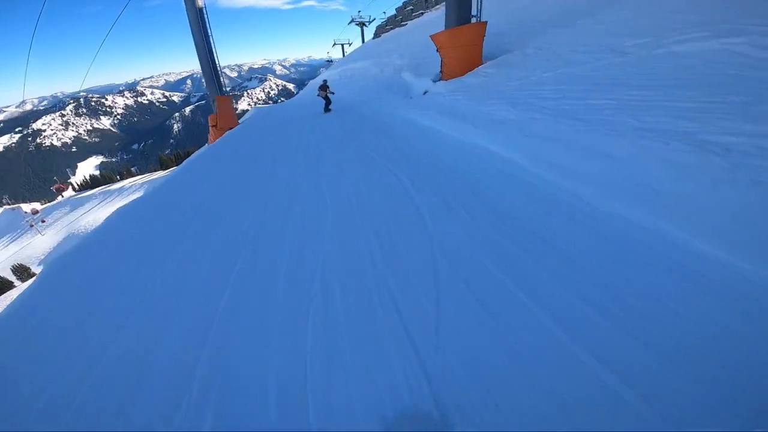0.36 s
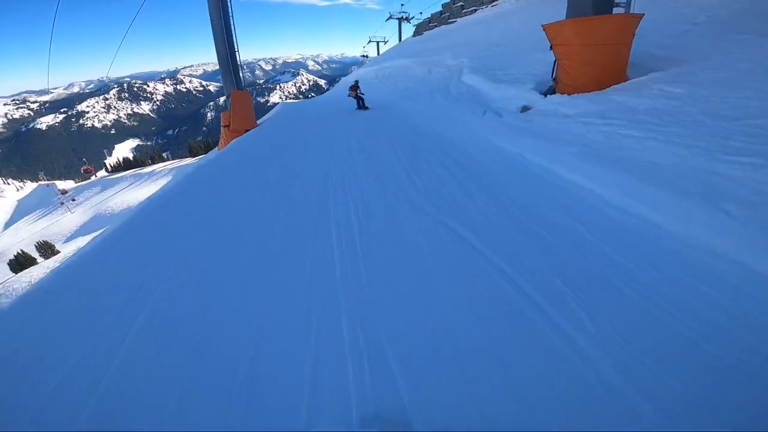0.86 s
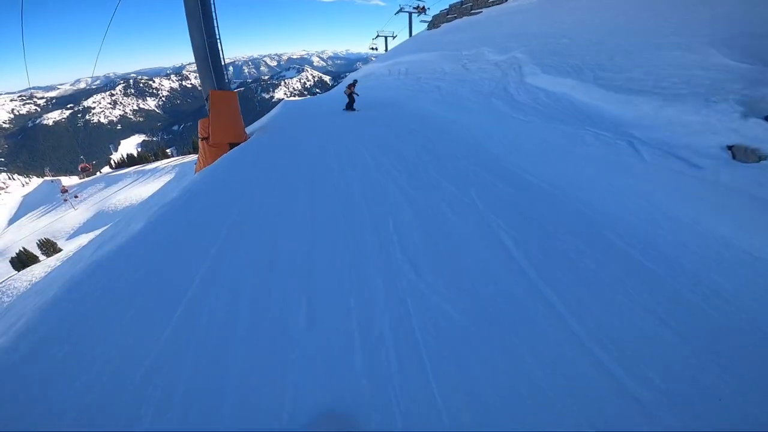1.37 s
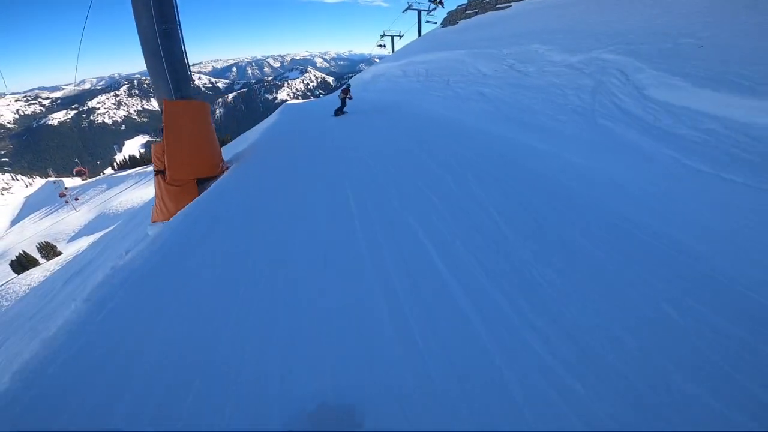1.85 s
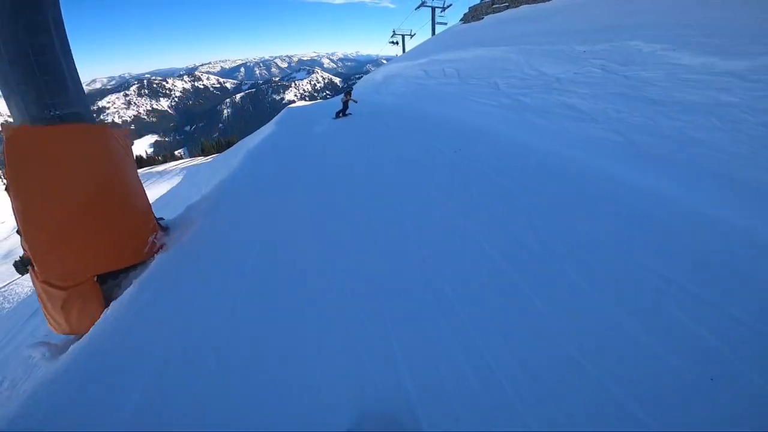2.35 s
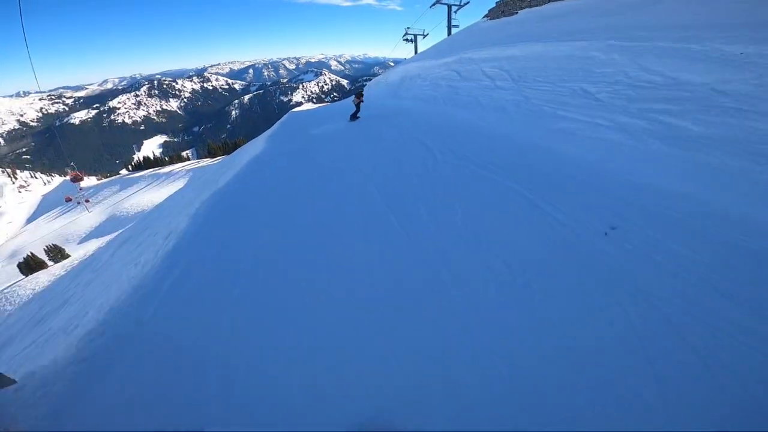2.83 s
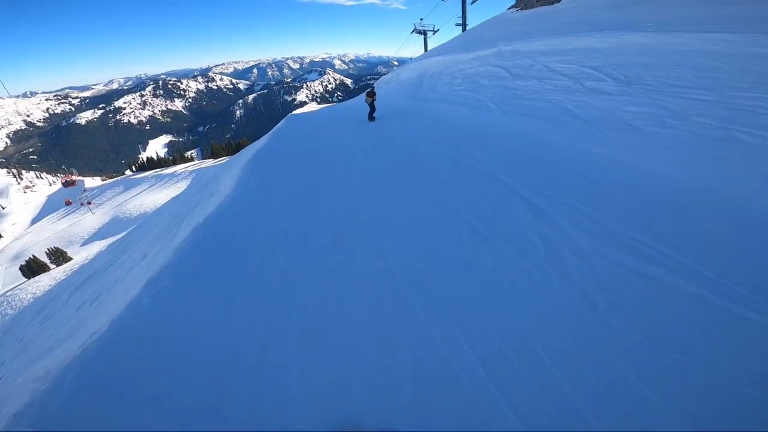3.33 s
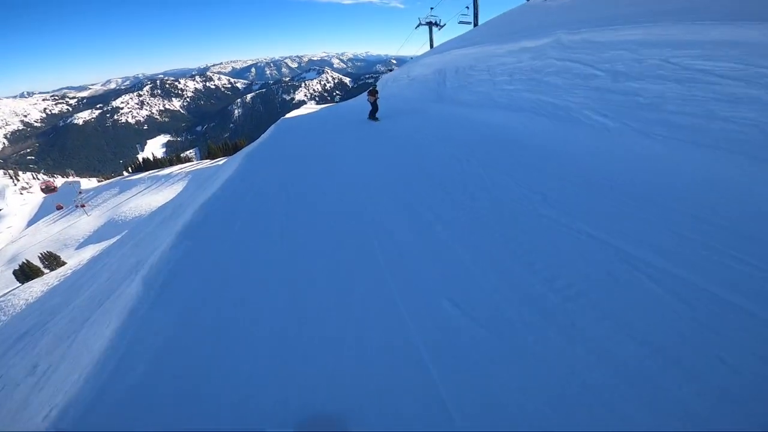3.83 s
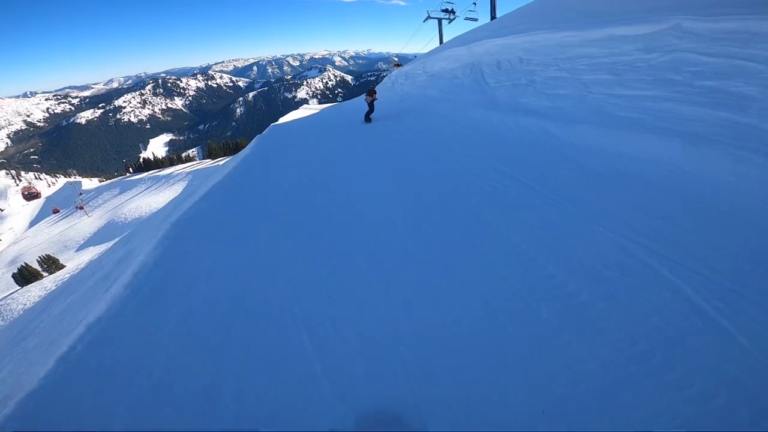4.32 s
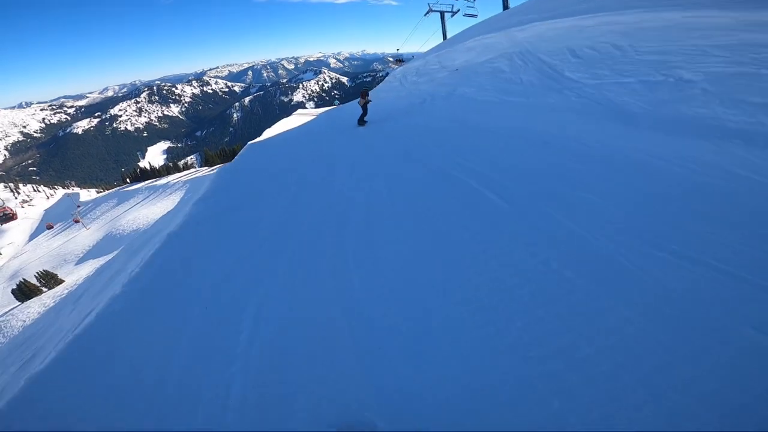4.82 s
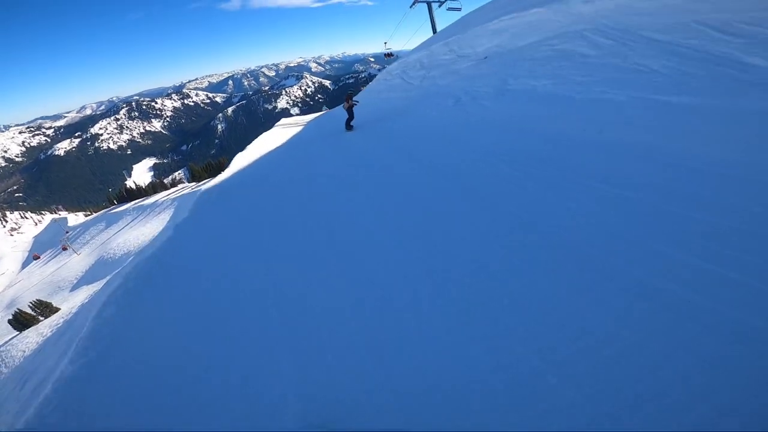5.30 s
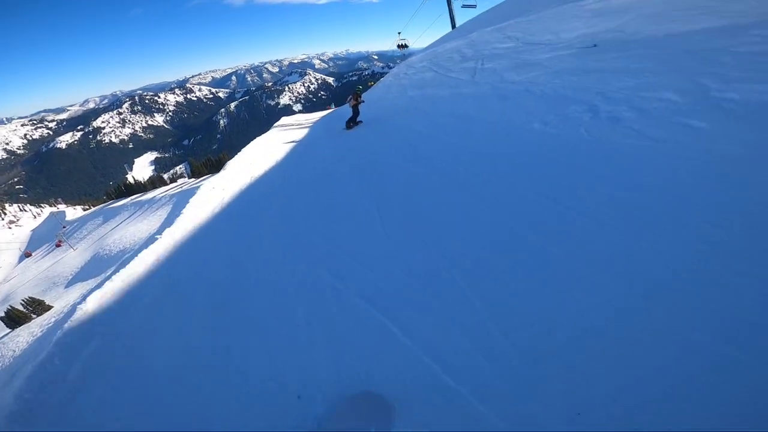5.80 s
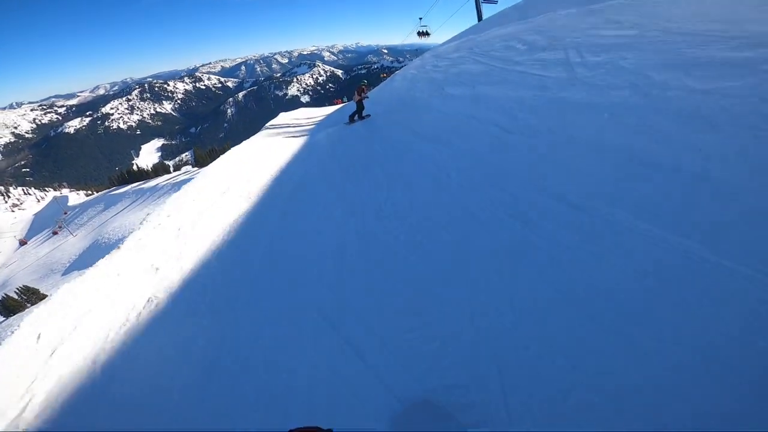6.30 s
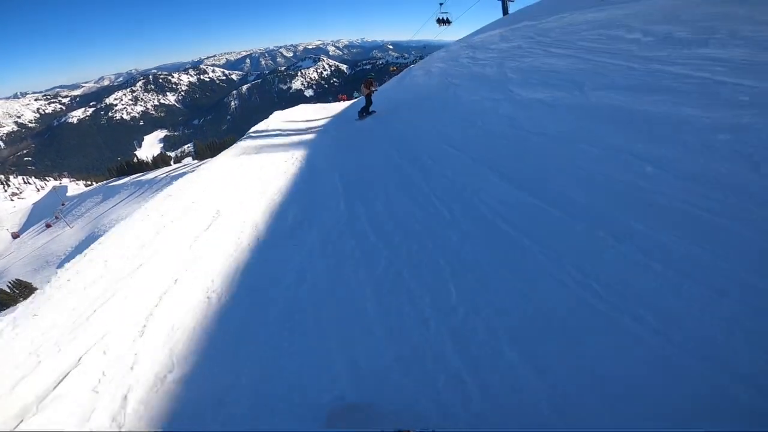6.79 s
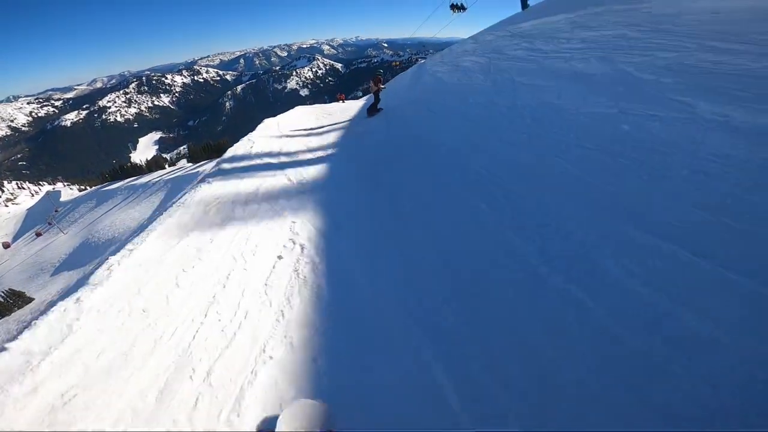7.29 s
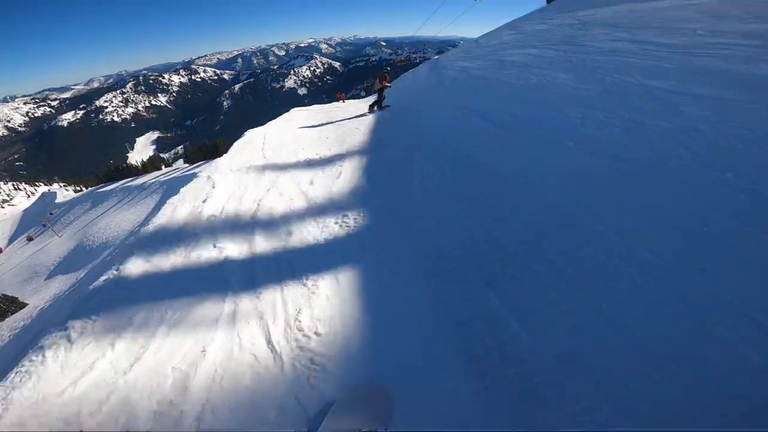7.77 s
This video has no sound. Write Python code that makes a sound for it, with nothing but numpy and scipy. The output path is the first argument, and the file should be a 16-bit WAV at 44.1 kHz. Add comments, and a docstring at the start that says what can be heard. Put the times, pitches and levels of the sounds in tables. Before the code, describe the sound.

Low wind buffets and roars over a small camera's housing while a snowboard edge scrapes firm snow, biting harder and hissing with spray near the end.

```python
"""A ride down firm snow, heard in a small camera's closed housing. From the start wind buffets the housing (low
noise), eddies roar in its air cavity (pushes and hiss), and the board edge scrapes, sings and throws spray (noise
bands). Short ticks fall near 0.5 s, then rarely; eddies slap from 0.6 s (short puffs); the opening hoots from 1 s
(narrow noise). The edge shrieks at 2.6 s and in strokes from 4.7 s (pitched hiss); from 5.5 s the spray's
4-6 kHz hiss swells, and the edge bites hardest after 6.3 s."""
import sys
import numpy as np
from scipy import signal
from scipy.fft import rfft, irfft, next_fast_len
from scipy.io import wavfile
from scipy.ndimage import uniform_filter1d, minimum_filter1d

SR = 44100
rng = np.random.default_rng(int(sys.argv[2]) if len(sys.argv) > 2 else 0)


def put_to_file(sound):
    """Save the sound as 16-bit audio at rate SR, in the file named by the first command-line argument."""
    columns = np.atleast_2d(sound).T  # one column per channel
    safe = np.clip(columns, -1, 1)
    whole_steps = np.round(safe * 32767)
    wavfile.write(sys.argv[1], SR, whole_steps.astype(np.int16))


def elevation(decibels):
    """Turn decibel levels (scalar or array-like) into linear amplitude ratios."""
    levels = np.asarray(decibels, float)
    return 10 ** (levels / 20)


N = 359415
TIME_S = np.arange(N) / SR

# source spectra ahead of the cavity, relative: freq_hz, density_db
BUFFET_SPECTRUM = [(12, -26.5), (22, -6), (54, 0), (110, -0.5), (160, -4.5), (330, -17), (700, -34),
                   (2000, -110)]
ROAR_SPECTRUM = [(40, -14), (200, 6.5), (330, 1), (570, -2), (780, -5.5), (1400, -13), (1900, -21),
                 (2200, -33), (4500, -48.5), (9000, -110)]
SLAP_SPECTRUM = [(150, -8.5), (600, 0.5), (1100, 3), (1900, -17.5), (4000, -44), (9000, -110)]
HOOT_SPECTRUM = [(500, -39.5), (950, -6.5), (1150, -5), (1400, -10.5), (2200, -57.5), (6000, -110)]
SCRAPE_SPECTRUM = [(600, -34.5), (2000, -5.5), (2600, 1.5), (3100, 0.5), (3900, -5.5), (4600, -10),
                   (5200, -24), (7000, -55)]
SING_SPECTRUM = [(1500, -69.5), (3100, -5.5), (3450, 0), (3750, -12.5), (6000, -52)]
SPRAY_SPECTRUM = [(2500, -23), (4300, 5.5), (5300, -0.5), (6050, -4), (7700, -7), (8300, -16.5),
                  (10500, -26), (12500, -30.5), (14500, -60.5)]
SPRAY_BRIGHT_SPECTRUM = [(3500, -24.5), (4400, -2.5), (5800, -1.5), (6150, -23.5)]
TICK_SPECTRUM = [(800, -24), (1700, -5), (1980, 7), (2250, -5), (2500, 1), (3050, -6), (3500, 3),
                 (4000, -4), (4550, 3), (5250, -12), (5700, -2), (6400, -24), (7100, -26), (8200, -38),
                 (11500, -35), (14000, -55)]
# air modes of the housing, over the walls' own path: freq_hz, width_hz, gain_db
CAVITY_MODES = [(1095, 330, 9.5), (3400, 420, 4)]
# microphone ports: freq_hz, likeness_0_to_1, right_lead_rad, left_over_right_db
PORT_RESPONSE = [(30, 0.9, .1, 7), (119, 0.94, 0.05, 3.5), (400, 0.66, 0.52, 2.5), (790, 1, 1.1, 4),
                 (1150, 0.98, 0.73, 7), (1700, 0.94, 0.69, 6), (2200, 0.4, 1.3, 3.5), (3360, 0.2, 1.6, 13),
                 (3970, .35, 1.3, 11.5), (4440, .2, 3.8, 10), (5200, 0.96, 3.7, 1.5), (5900, .68, 11, 0.5),
                 (6600, .15, 4, 7.5), (8020, .1, 2.4, 26), (12000, .3, .1, 10.5)]
# head turning against the airflow, used less its mean: time_s, left_over_right_db
FACING = [(0, 3.5), (1.4, 4.5), (2.1, 3), (2.8, 3.5), (4.2, 3), (4.6, 5.5), (5.5, 3), (6.1, 4.5),
          (6.8, 4.5), (7.2, 3), (8.15, 3.5)]
# air speed as buffeting strength, before gusts: time_s, level_db
AIRFLOW = [(0, -20.5), (.33, -19.5), (.5, -22.5), (.75, -18), (1.5, -18), (1.7, -16), (2.36, -22.5),
           (2.53, -16.5), (2.75, -20), (3.6, -16), (3.76, -19), (3.95, -16), (4.4, -18), (4.95, -22),
           (5.6, -15.5), (5.95, -23), (6.55, -19), (6.92, -24), (7.12, -16), (7.5, -22), (7.72, -15),
           (8.15, -20)]
# gusts tearing eddies off the housing: start_s, length_s, swell_db
GUSTS = [(0.11, 0.31, 3.5), (0.54, 0.28, 4), (0.99, 0.17, 5.5), (1.5, 0.64, 9), (2.41, 0.33, 3),
         (2.66, 0.18, 6.5), (2.97, 0.088, 5.5), (3.04, 0.56, 6), (3.4, 0.36, 7.5), (3.81, 0.36, 12),
         (4.07, 0.26, 12), (4.53, 1.06, 8.5), (4.7, 0.15, 3.5), (4.98, 0.12, 6.5), (5.23, 0.17, 6),
         (5.3, 0.94, 9.5), (6.15, 0.22, 5), (6.25, 1.34, 11), (7.15, 0.12, 7), (7.38, 0.14, 3),
         (7.38, 1.25, 10.5)]
# strong single eddies slapping the housing, before the ports: start_s, peak_db
SLAPS = [(0.592, -20), (0.895, -15.5), (1.057, -19), (1.527, -23), (1.911, -17), (2.364, -22),
         (2.477, -18.5), (2.529, -14.5), (2.67, -21), (2.722, -18), (3.004, -14.5), (3.483, -13),
         (3.551, -15.5), (3.923, -22), (4.046, -17), (4.102, -19), (4.867, -19.5), (5.118, -13.5),
         (5.724, -19.5), (5.774, -13.5), (6.188, -21.5), (6.808, -25), (7.173, -15.5), (7.304, -25.5),
         (7.423, -25.5), (7.485, -25.5), (7.674, -20), (7.859, -19.5)]
# airflow across the housing's opening: start_s, length_s, swell_db
HOOTS = [(1.0, 0.23, 7), (1.75, .35, 7), (2.42, 0.55, 9.5), (3.9, 0.45, 8), (4.73, 0.15, 15.5),
         (4.99, 0.15, 9), (5.5, 0.16, 10), (6.16, 0.14, 17), (6.4, 0.46, 15), (6.72, 0.21, 16),
         (6.93, 0.32, 9), (7.55, 1, 12)]
# edge biting into snow: start_s, length_s, swell_db
BITES = [(.07, 0.47, 0.5), (.67, 0.16, 4), (.86, .39, 3), (1.55, 0.5, 4), (2.26, 0.99, 7.5), (2.63, .22, 4),
         (2.81, 1.1, 4), (3.07, 0.16, 5.5), (3.71, 0.81, 5.5), (3.97, 0.067, 11.5), (4.54, 1.24, 10),
         (4.7, 0.14, 6), (4.98, .14, 12), (5.21, 0.15, 5.5), (5.36, 1.32, 8), (5.43, 0.28, 5.5),
         (6.28, 1.26, 15.5), (7.33, 1.57, 12)]
# board skidding sideways: start_s, length_s, swell_db
SKIDS = [(.06, 0.32, 5.5), (.81, 0.86, 2), (.95, 0.21, 4), (1.23, .14, 6), (1.64, .1, 5),
         (1.86, 0.057, 3.5), (2.71, 1.2, 3.5), (3.07, 0.16, 2.5), (4.53, 0.87, 1), (5.51, 1.47, 3.5),
         (5.7, 0.28, 1), (6.31, 1.37, 7.5), (7.38, 0.65, 7), (7.66, 0.98, 7)]
# shrieks of the loaded edge, before the ports: start_s, length_s, nominal_top_db, pitch_hz
STROKES = [(2.603, 0.21, -60, 3460), (4.718, 0.12, -53, 3370), (5.0, 0.089, -53, 3400),
           (6.277, 0.17, -46.5, 3480), (6.45, 0.85, -47, 3400), (6.748, 0.15, -44.5, 3370),
           (6.844, .1, -41, 3340), (7.84, 0.21, -53, 2880), (7.87, 0.17, -63, 4400),
           (8.056, 0.17, -52, 4200)]
# bright spray swells: start_s, length_s, swell_db
SPRAY_SWELLS = [(5.55, .95, 17), (6.4, 1.2, 12), (7.35, 1.3, 15)]
# short ticks on the housing, and the sharp top of the slap at 3.004 s, before left/right balance:
# start_s, peak_db, brightness_db_per_octave
TICKS = [(0.5073, -22.5, 0), (0.5105, -29, -4), (0.6576, -33, -3), (3.004, -26, -18), (3.482, -45, -2),
         (7.37, -33, 5)]


def evened(x):
    """Scales to rms 1."""
    return x / np.sqrt(np.mean(x ** 2) + 1e-20)


def read(points, hz):
    """Joins table rows by straight lines on a log-frequency axis, one array a column."""
    freq_hz, *columns = np.transpose(points)
    return [np.interp(np.log(hz + 1), np.log(freq_hz + 1), c) for c in columns]


def swells(rows):
    """Sum in dB of smooth swells that rise faster than they fall."""
    rise = 0.34  # share of the length
    out_db = np.zeros(N)
    for start_s, length_s, swell_db in rows:
        u = (TIME_S - start_s) / length_s
        ramp = np.clip(np.minimum(u / rise, (1 - u) / (1 - rise)), 0, 1)
        out_db += swell_db * np.sin(np.pi / 2 * ramp) ** 2
    return out_db


def wander(hz):
    """Slow chance of rms 1, with most of its motion under hz."""
    z = rfft(rng.standard_normal(N))
    return evened(irfft(z / (1 + (np.fft.rfftfreq(N, 1 / SR) / hz) ** 2), N))


def scatter(per_s, spread_db):
    """Random one-way single pushes, a few much larger than the rest."""
    sizes = elevation(spread_db * np.minimum(rng.exponential(1, N), 3.2))
    return evened(sizes * (rng.random(N) < per_s / SR))


def dying(pushes, t60_s):
    """Envelope that jumps at each push and dies away."""
    return evened(signal.lfilter([1], [1, -elevation(-60 / (t60_s * SR))], pushes))


def cavity(x, spectrum):
    """Causal filter: a source spectrum with the housing's air modes ringing on top."""
    hz = abs(np.fft.fftfreq(8192, 1 / SR))
    rings = sum(elevation(gain_db) ** 2 / (1 + (2 * (hz - mode_hz) / width_hz) ** 2) ** 2
                for mode_hz, width_hz, gain_db in CAVITY_MODES)
    log_gain = np.log(elevation(read(spectrum, hz)[0]) * np.sqrt(1 + rings))
    minimum_phase = np.exp(np.conj(signal.hilbert(log_gain)))
    taps = np.fft.ifft(minimum_phase).real[:4096] * np.hanning(8192)[4096:]
    return signal.oaconvolve(x, taps[None] / np.linalg.norm(taps), axes=1)[:, :N]


def rush(envelope, spectrum, level_db, pushes=0):
    """Two unrelated noises under one envelope, plus sharp pushes, coloured and set to a level curve."""
    drive = evened(envelope) * rng.standard_normal((2, N)) + pushes
    return elevation(level_db) * evened(cavity(drive, spectrum))


def strikes(rows, spectrum, rise_s, t60_s, push):
    """A sharp push and a short puff of noise at given moments; a third column tilts its colour."""
    out, t_s = np.zeros((2, N)), np.arange(2000) / SR
    shape = (1 - np.exp(-t_s / rise_s)) * elevation(-60 * t_s / t60_s)
    for start_s, peak_db, *bright_db in rows:
        tilted = [(hz, db + sum(bright_db) * np.log2(hz / 4000)) for hz, db in spectrum]
        drive = shape * rng.standard_normal((2, len(t_s))) + push * (t_s == 0)
        puff = cavity(drive, tilted)[:, :len(t_s)]
        puff *= elevation(peak_db) / abs(puff[0]).max()
        part = out[:, round(start_s * SR):][:, :len(t_s)]
        part += puff[:, :part.shape[1]]
    return out


def lumpy(x, patchy_db):
    """Random patches, some 60 ms by 300 Hz, lift and sink parts of the sound."""
    z = signal.stft(x, nperseg=512)[2]
    patches = uniform_filter1d(rng.standard_normal(z.shape[1:]), size=4, axis=0)
    patches = uniform_filter1d(patches, size=10, axis=1)
    return signal.istft(z * elevation(patchy_db * evened(patches)), nperseg=512)[1][:, :N]


def ports(pair):
    """The left port hears the first sound; the right hears part of it, shifted, and part of the second."""
    size = next_fast_len(N + SR)
    same, lead_rad, left_db = read(PORT_RESPONSE, np.fft.rfftfreq(size, 1 / SR))
    same, share = np.clip(same, 0, 1), elevation(-left_db)
    first, second = rfft(pair, size)
    right = share * np.exp(1j * lead_rad) * (same * first + np.sqrt(1 - same ** 2) * second)
    # levels refer to the mean of both ports
    middle = np.sqrt(1 + share ** 2 + 2 * share * same * np.cos(lead_rad)) / 2
    return irfft(np.array([first, right]) / middle, size)[:, :N]


def wind_buffet(airflow_db, gust_db, chatter):
    """Air speed presses low noise on the housing; gusts add a little."""
    return rush(elevation(1.9 * chatter), BUFFET_SPECTRUM, airflow_db + 0.18 * gust_db)


def eddy_roar(airflow_db, gust_db, chatter, shed, eddies):
    """Each shed eddy pushes the membrane one way, then hisses off."""
    level_db = -32 + gust_db + 0.18 * (airflow_db - airflow_db.mean())
    envelope = elevation(1.1 * chatter) * (1.04 + 0.5 * eddies)
    return rush(envelope, ROAR_SPECTRUM, level_db, 0.29 * shed)


def eddy_slaps():
    """Strong single eddies strike the housing: a push and a puff."""
    return strikes(SLAPS, SLAP_SPECTRUM, rise_s=0.0015, t60_s=0.015, push=10.0)


def opening_hoot(chatter, eddies):
    """Airflow across the housing's opening excites its lowest air mode."""
    envelope = elevation(0.5 * chatter) * (1.3 + 0.37 * eddies)
    return rush(envelope, HOOT_SPECTRUM, -42.5 + swells(HOOTS))


def edge_scrape(bite_db, skid_db, chatter, eddies, crunch):
    """The edge scrapes and crunches snow, more as it bites and skids."""
    envelope = elevation(0.22 * chatter + 0.82 * wander(33)) * (0.97 + 0.16 * eddies + 0.3 * crunch)
    return rush(envelope, SCRAPE_SPECTRUM, -59 + 0.79 * bite_db + 0.34 * skid_db)


def edge_sing(bite_db, skid_db):
    """The loaded steel edge sings when it bites, less when it skids."""
    return rush(elevation(1.2 * wander(25)), SING_SPECTRUM, -64.5 + bite_db - 0.29 * skid_db)


def edge_shrieks():
    """Each stroke is a rough band of hiss around its pitch that swells and fades."""
    width, swell_db = 0.059, 17.5  # width as a share of the pitch
    out = np.zeros((2, N))
    for start_s, length_s, top_db, hz in STROKES:
        band = [(hz / 2, -60), (hz * (1 - width), -8), (hz, 0), (hz * (1 + width), -8), (hz * 2, -60)]
        swell = elevation(swells([(start_s, length_s, swell_db)])) - 1  # from silence
        out += swell * rush(elevation(2.7 * wander(60)), band, top_db - swell_db)
    return out


def snow_spray(bite_db, skid_db, chatter, crunch):
    """Sideways skids throw fine snow, a high hiss."""
    envelope = elevation(0.25 * chatter + 0.7 * wander(30)) * (1.1 + 0.25 * crunch)
    return rush(envelope, SPRAY_SPECTRUM, -67 + skid_db + 0.13 * bite_db)


def bright_spray(crunch):
    """The spray's 4-6 kHz hiss swells."""
    envelope = elevation(1.2 * wander(25)) * (1.1 + 0.3 * crunch)
    return rush(envelope, SPRAY_BRIGHT_SPECTRUM, -82 + swells(SPRAY_SWELLS))


def short_ticks():
    """Brief pushes, bright or dull."""
    return strikes(TICKS, TICK_SPECTRUM, rise_s=0.0004, t60_s=0.011, push=5)


def scene():
    """Wind, edge, spray and ticks, all heard through the housing."""
    airflow_db = np.interp(TIME_S, *np.transpose(AIRFLOW))
    gust_db, bite_db, skid_db = swells(GUSTS), swells(BITES), swells(SKIDS)
    chatter = wander(6.8)  # bumps in the snow shake rider, housing and edge together
    shed = scatter(per_s=160, spread_db=4.0)
    eddies = dying(shed, t60_s=0.025)
    crunch = dying(scatter(per_s=400, spread_db=2.5), t60_s=0.0076)

    roar = eddy_roar(airflow_db, gust_db, chatter, shed, eddies)
    hollow = lumpy(roar + opening_hoot(chatter, eddies), patchy_db=1.05)
    facing_db = np.interp(TIME_S, *np.transpose(FACING))
    facing_db -= facing_db.mean()  # the mean balance belongs to the ports
    wind = ports(wind_buffet(airflow_db, gust_db, chatter) + hollow + eddy_slaps())
    wind *= elevation([facing_db / 2, -facing_db / 2])

    scrape = edge_scrape(bite_db, skid_db, chatter, eddies, crunch)
    spray = snow_spray(bite_db, skid_db, chatter, crunch)
    snow = ports(lumpy(scrape + spray + bright_spray(crunch), patchy_db=1.3))
    edge = ports(edge_sing(bite_db, skid_db) + edge_shrieks()) * elevation([[-1.5], [4]])  # left, right
    return wind + snow + edge + short_ticks() * elevation([[2.5], [-4]])


def band_limit(x):
    """A steep low-pass at the top of the band."""
    return signal.sosfilt(signal.butter(12, 14000, fs=SR, output="sos"), x)


def record(dry):
    """Fast gain control holds down the largest buffets."""
    power_db = 10 * np.log10(abs(uniform_filter1d((dry ** 2).max(0), 200)) + 1e-12)
    over_db = np.maximum(power_db + 13.5, 0)
    held_db = -minimum_filter1d(-over_db, 500)  # reacts just ahead of each crest
    mix = dry / elevation(0.38 * uniform_filter1d(held_db, 500))
    return band_limit(mix)


dry = scene()
out = record(dry)
put_to_file(out)
```